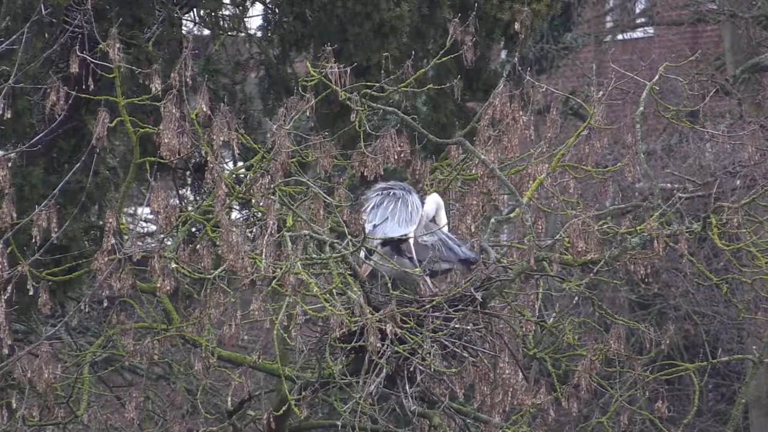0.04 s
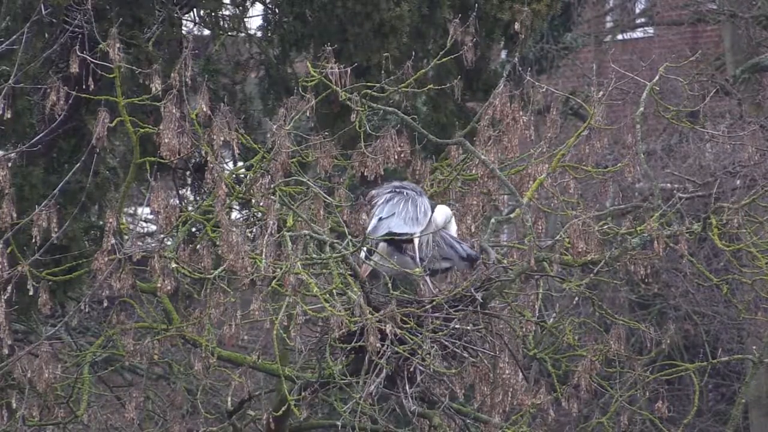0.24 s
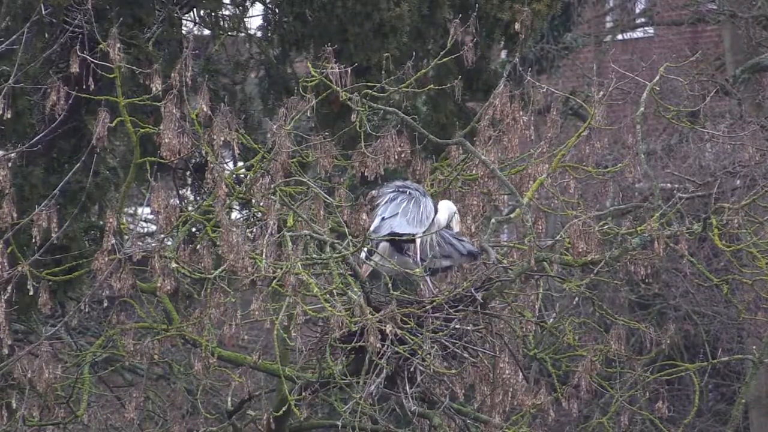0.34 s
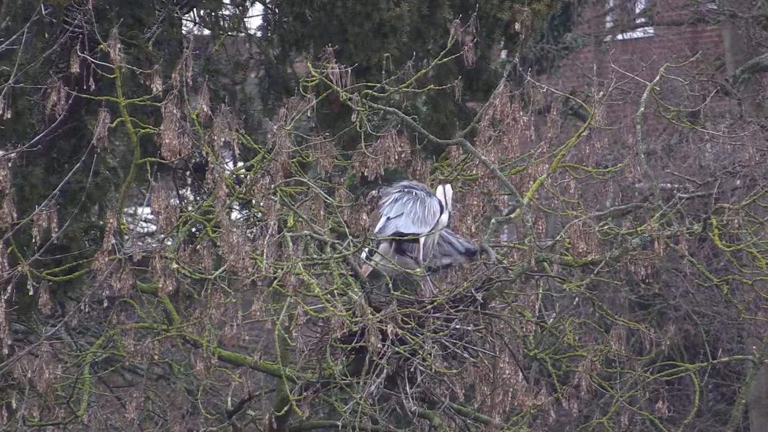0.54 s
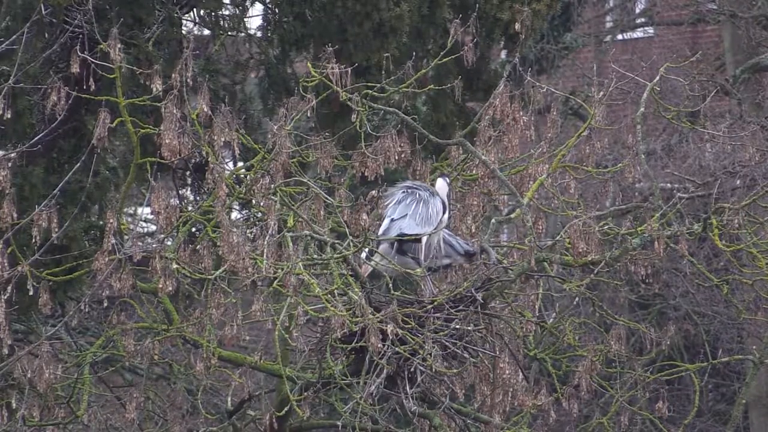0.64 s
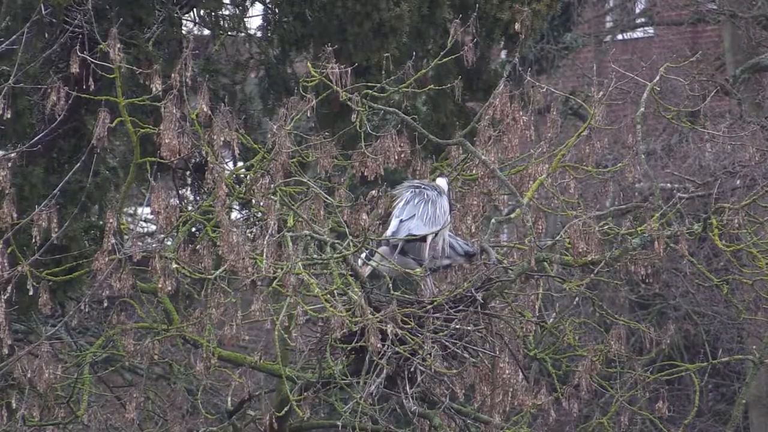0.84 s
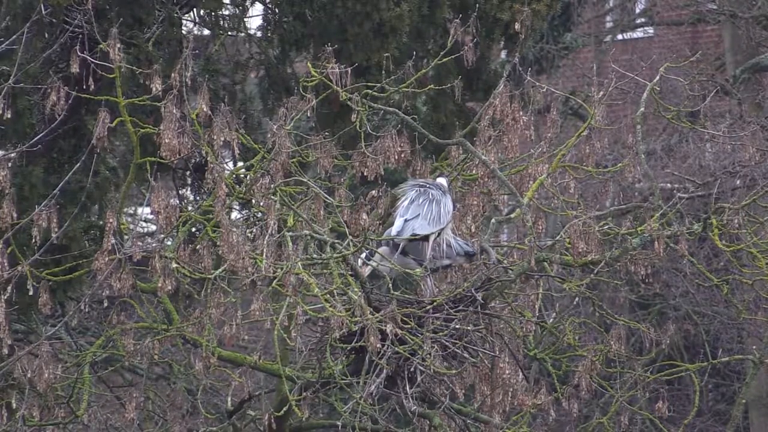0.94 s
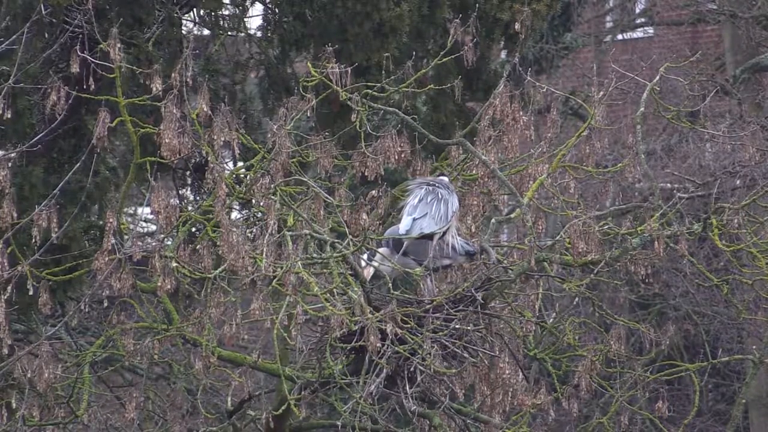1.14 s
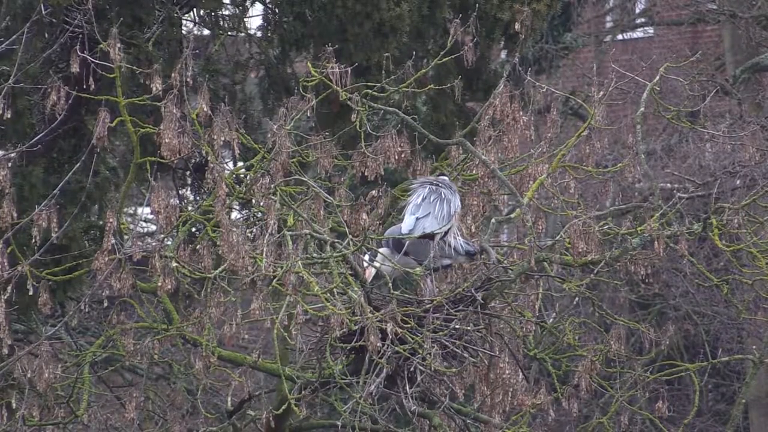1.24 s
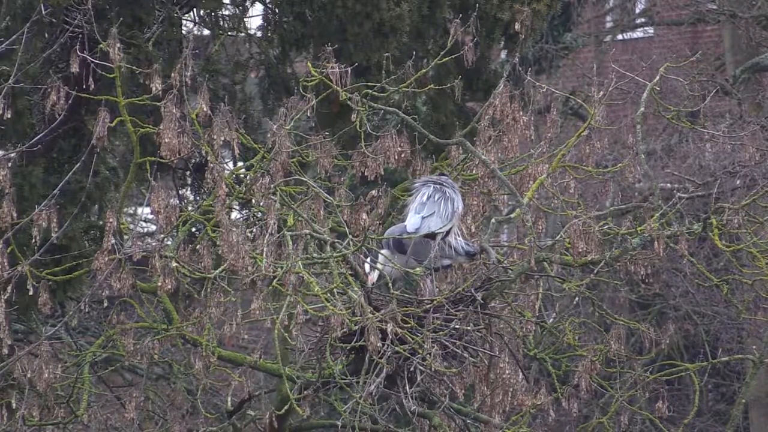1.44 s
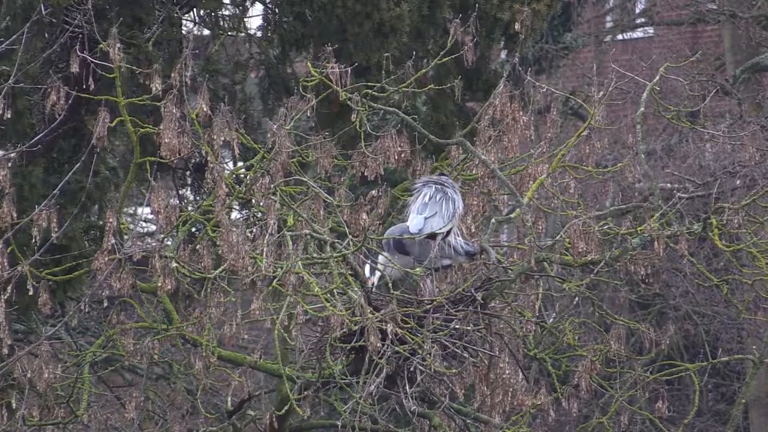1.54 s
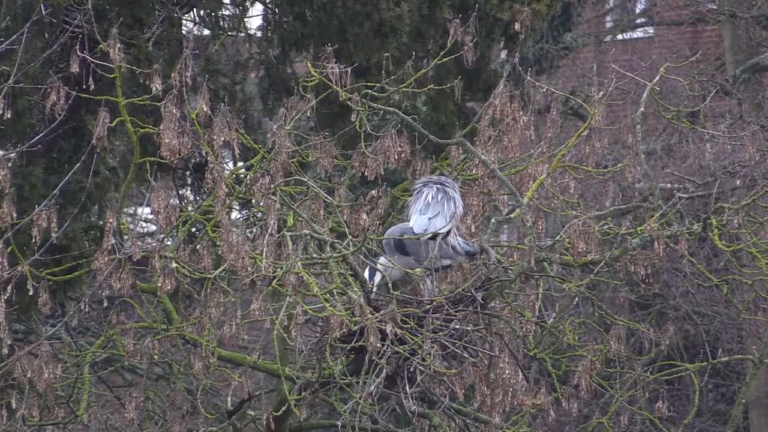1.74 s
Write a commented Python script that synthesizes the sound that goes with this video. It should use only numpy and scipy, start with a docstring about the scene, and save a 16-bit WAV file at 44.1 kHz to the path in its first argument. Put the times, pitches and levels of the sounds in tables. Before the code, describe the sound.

A large bird squawks once, high and rasping, breaking into a growl near the end. A few dull stick knocks and a short croak follow, outdoors among trees, with a low rumble and faint faraway birds behind.

```python
"""A heron on a treetop nest gives one long harsh squawk and, later, a brief croak.
Its voice is a high reedy tone, shaped by the throat and chopped into bursts by a flutter of the
airway, with air rasping and hissing along. Near its end the squawk breaks to a lower growl.
Shifting nest sticks knock and tick, far birds call over a low outdoor rumble,
and the trees send back a faint echo."""
import sys
import numpy as np
from scipy import signal
from scipy.fft import rfft, irfft
from scipy.io import wavfile
from scipy.ndimage import uniform_filter1d

SR = 44100
rng = np.random.default_rng(int(sys.argv[2]) if len(sys.argv) > 2 else 0)


def generate_wav(sig):
    """Save sig (samples, or channels by samples) to the path in sys.argv[1] as 16-bit PCM at SR."""
    pcm = np.round(np.clip(np.atleast_2d(sig).T, -1, 1) * 32767).astype(np.int16)
    wavfile.write(sys.argv[1], SR, pcm)


N = 79380
T = np.arange(N) / SR

# The tone of the outdoor background. Each row: frequency in Hz, relative strength in dB.
AIR_SPECTRUM = [(22, -9), (45, 7.5), (90, -1), (280, -5), (450, -8.5), (1300, -12.5), (2000, -18),
                (2800, -18.5), (4000, -24), (5300, -39.5), (11000, -46.5), (15500, -49)]
# How the rustle dies down. Each row: time in seconds, change of level in dB.
RUSTLE_LEVELS = [(0, 1.5), (1, -0.5), (1.4, -3), (1.8, -5.5)]
# Far birds. Each row: start and length in seconds, first, middle and last pitch in Hz, level in dB.
FAR_CALLS = [(0.093, 0.14, 1265, 1190, 1370, -36.5), (0.072, 0.19, 285.2, 301.3, 332, -40.5),
             (0.552, 0.27, 383, 360, 394, -39), (0.934, 0.14, 660, 711, 648, -37),
             (1.04, 0.058, 1230, 1174, 1020, -37.5), (1.542, 0.044, 4030, 3980, 3420, -46),
             (1.771, 0.036, 3150, 3290, 3380, -53)]
# Dull nest knocks. Each row: start in seconds, ringing frequency in Hz, level in dB, decay in seconds.
STICK_KNOCKS = [(0.155, 696, -29, 0.0023), (1.232, 203, -27.5, 0.026), (1.293, 850, -35, 0.043),
                (1.368, 550, -23.5, 0.0091), (1.397, 373, -33, 0.021), (1.455, 476, -29.5, 0.0068)]
# Dry twig ticks. Each row: start in seconds, level in dB.
TWIG_TICKS = [(0.056, -33.5), (0.156, -33), (.169, -33), (1.019, -36.5), (1.18, -47)]

# How fast the airway flutters. Each row: time in seconds, bursts per second.
SQUAWK_FLUTTER = [(.2, 53.9), (.28, 61), (.39, 60.4), (.41, 56), (.47, 59.5), (.56, 59.7), (.59, 57),
                  (.76, 51.7), (.85, 48.1), (.88, 56.5)]
CROAK_FLUTTER = [(1.486, 63.5)]
# The heron's voice. Each row: time in seconds, pitch in Hz, roughness from 0 to 1.
SCREAM_VOICE = [(.21, 780, .9), (.231, 900, .8), (.241, 985, .1), (.258, 1015, .12), (.28, 1125, .4),
                (.31, 1085, .45), (.36, 1010, .42), (.382, 1085, .85), (.407, 1050, .08), (.475, 1062, .12),
                (.565, 1015, .12), (.585, 988, .05), (.6, 1012, .45), (.632, 970, .08), (.657, 985, .1),
                (.668, 850, .45)]
GROWL_VOICE = [(.68, 673, 0.19), (.712, 698.5, .05), (.73, 738, 0.14), (.768, 756.7, 0.33),
               (.779, 638.8, .09), (.8, 697.7, 0.11), (.828, 665, .1), (.842, 795, 1)]
CATCH_VOICE = [(.873, 705, .4), (.879, 1000, .2), (.888, 1005, .15), (.892, 650, .55), (.92, 715, .95)]
CROAK_VOICE = [(1.505, 536, 0.74), (1.527, 598.7, 0.64), (1.536, 834, 0.2)]
# Its loudness. Each row: time in seconds, level of the body (the lower tones) in dB, treble level in dB.
SCREAM_LEVELS = [(.211, -27, -42), (.224, -19.5, -29.5), (.245, -19.5, -20), (.265, -11.5, -23.5),
                 (.386, -13, -23), (.415, -16.5, -20), (.445, -14.5, -20), (.48, -12, -21.5),
                 (.56, -13, -21.5), (.585, -14.5, -19.5), (.63, -19, -22), (.656, -19, -22),
                 (.675, -22, -33)]
GROWL_LEVELS = [(0.681, -21, -24.5), (.71, -21.5, -25), (.735, -21.5, -32), (0.782, -18, -30.5),
                (.8, -23.5, -31.5), (0.824, -23.5, -29.5), (.853, -27, -47)]
CATCH_LEVELS = [(.859, -30, -52), (.87, -23, -42), (.875, -25, -40), (.885, -20.5, -29.5), (.902, -20, -34),
                (.919, -27, -48)]
CROAK_LEVELS = [(1.507, -29, -48), (1.514, -28, -45), (1.525, -23, -38.5), (1.538, -19.5, -39),
                (1.542, -22, -42)]
# How the throat and open bill colour the voice. Each row: frequency in Hz, boost or cut in dB.
SCREAM_THROAT = [(600, -10), (850, -13.5), (1030, -6), (1300, -10), (1700, -1), (2080, 7), (2500, -5.5),
                 (3050, -12.5), (3450, -22), (4150, -12), (5100, -10.5), (6000, -23), (7100, -25.5),
                 (8200, -37), (9500, -51), (12500, -44), (15000, -51)]
GROWL_THROAT = [(680, -14), (1000, -8), (1300, -9), (1490, 9), (1720, 9.5), (1950, 3.5), (2250, -2),
                (2750, -7.5), (3350, -22), (4100, -5), (4800, -11), (7000, -27.5), (8200, -35.5),
                (10000, -38), (14500, -48)]
CATCH_THROAT = [(600, -5), (1000, -6), (1350, 14), (2000, -6.5), (2950, 4), (3400, -4.5), (4000, 6),
                (5000, -8.5), (7200, -24.5), (12000, -18.5), (15000, -32)]
CROAK_THROAT = [(580, -2.5), (850, -28), (1250, 1), (1650, 6.5), (2450, 1.5), (3000, -21), (3500, -9),
                (4300, -22), (7200, -39.5), (12500, -32.5), (15000, -46)]

# One burst, in shares of a flutter cycle: when it opens, rise time, when it is shut, fall time.
SQUAWK_BURST = (.03, .27, 1, .19)
CROAK_BURST = (.02, .12, .87, .2)
PIPE_SPACING_HZ, PIPE_SLIDE_HZ_PER_S = 515, 4800  # gap between windpipe resonances; how fast they fall
TREBLE_HZ, TOP_HZ = 3050, 15600  # where the treble begins and ends
EDGE_S = .005  # short fade at the edge of a sound


def amp(db):
    """Turns decibels into a number to multiply by."""
    return 10 ** (np.asarray(db) / 20)


def unit(x):
    """Scales a sound to an average strength (rms) of 1."""
    return x / np.sqrt(np.mean(x ** 2))


def curve(rows):
    """Each column of a table, joined by straight lines in time."""
    times, *columns = np.array(rows, float).T
    return [np.interp(T, times, c) for c in columns]


def response(points, hz):
    """How strongly a table of Hz and dB lets the given frequencies through."""
    f, db = np.array(points, float).T
    return amp(np.interp(np.log(np.maximum(hz, 1)), np.log(f), db))


def noise(shape):
    """Noise of strength 1, coloured by a function of frequency."""
    spectrum = rfft(rng.standard_normal(N)) * shape(np.fft.rfftfreq(N, 1 / SR))
    return unit(irfft(spectrum, N))


def wobble(hz):
    """Random motion up to about the given rate."""
    return noise(lambda f: 1 / (1 + (f / hz) ** 4))


def ring(hz, q):
    """Noise gathered around one frequency; a higher q makes the band narrower."""
    return noise(lambda f: 1 / (1 + (q * (f / hz - hz / (f + 1))) ** 2) ** 2)


def outdoors(split_hz=500):
    """Far rumble, a light uneven rustle, a deep drone that slowly fades and a thin hiss that grows."""
    low_share = lambda f: 1 / (1 + (f / split_hz) ** 4)
    rumble = amp(-34) * noise(lambda f: response(AIR_SPECTRUM, f) * np.sqrt(low_share(f)))
    rustle = noise(lambda f: response(AIR_SPECTRUM, f) * np.sqrt(1 - low_share(f)))
    rustle *= amp(-39.5 + curve(RUSTLE_LEVELS)[0] + wobble(hz=34))
    drone = amp(-38.5 - 1.5 * T) * ring(hz=47.35, q=3.4)
    hiss = amp(-84 + 12 * T) * ring(hz=8000, q=.19)
    return rumble + rustle + drone + hiss


def far_birds():
    """Faint calls, each one swell on a bending pitch, with an overtone as dull as the background."""
    calls = np.zeros(N)
    for start, length, first, middle, last, db in FAR_CALLS:
        progress = np.clip((T - start) / length, 0, 1)
        swell = np.sin(np.pi * progress)
        hz = first + (last - first) * progress + (middle - (first + last) / 2) * swell ** 2
        phase = 2 * np.pi * np.cumsum(hz) / SR
        overtone = amp(-11) * response(AIR_SPECTRUM, 2 * middle) / response(AIR_SPECTRUM, middle)
        calls += amp(db) * np.sqrt(2) * swell * (np.sin(phase) + overtone * np.sin(2 * phase))
    return calls


def tree_echo(sound, length_s=.14):
    """The trees scatter a sound back as a faint, short echo."""
    tail = ring(hz=1560, q=.14) * amp(-60 * T / length_s) * np.minimum(T / .002, 1)
    tail /= np.sqrt(np.sum(tail ** 2))
    return amp(-21) * signal.fftconvolve(sound, tail)[:N]


def nest_sticks(snaps_per_s=12, snap_decay_s=.0015):
    """Sticks shift in the nest: dull knocks, small dry ticks and a faint scatter of tiny snaps."""
    def hit(start, decay_s):
        rise = np.clip((T - start) / EDGE_S + 1, 0, 1) ** 2
        return rise * np.exp(-np.abs(T - start) / decay_s)

    knocks = sum(amp(db) * hit(start, decay) * ring(hz, q=.86) for start, hz, db, decay in STICK_KNOCKS)
    ticks = sum(amp(db) * hit(start, decay_s=.0048) for start, db in TWIG_TICKS) * ring(hz=2820, q=.98)
    kicks = (rng.random(N) < snaps_per_s / SR) * rng.random(N)
    snaps = signal.fftconvolve(kicks, np.exp(-T / snap_decay_s))[:N] * ring(hz=6500, q=.41)
    return knocks + ticks + amp(-49) * snaps


def per_burst(burst):
    """A random value held through each burst, sliding smoothly to the next."""
    values = np.clip(rng.standard_normal(burst[-1] + 1), -2, 2)
    return uniform_filter1d(values[burst], size=60)


def flutter(rates, shape, leak=.09, sag_depth=.19, sag_width=.125):
    """The airway flaps open and shut. Gives its opening, the bend in pitch and each burst's number."""
    opens, rise, shut, fall = shape
    started = T >= rates[0][0]
    cycles = np.cumsum(curve(rates)[0] * started) / SR
    burst, progress = cycles.astype(int), cycles % 1
    slowness = np.exp(.34 * per_burst(burst))  # some bursts catch later than others
    ease = lambda u: np.sin(np.pi / 2 * np.clip(u, 0, 1)) ** 2
    opening = ease((progress - opens) / (rise * slowness)) * ease((shut - progress) / fall)
    # The pitch sags at both ends of a burst.
    start_sag = np.exp(-(progress / (sag_width * slowness)) ** 2 / 2)
    end_sag = np.exp(-2 * (1 - progress) / sag_width)
    return leak + opening, 1 - sag_depth * (start_sag + end_sag), burst


def windpipe(sound, echo_share=.8):
    """Echoes up and down the windpipe make a row of resonances (boosted tones) that slide downward."""
    sound = signal.hilbert(sound)  # in this form each echo can be shifted in phase
    lag = round(SR / PIPE_SPACING_HZ)
    round_trip = echo_share * np.exp(-2j * np.pi * PIPE_SLIDE_HZ_PER_S * T / PIPE_SPACING_HZ)
    return unit(sum(np.roll(sound, k * lag) * round_trip ** k for k in range(4)).real)


def breath(throat, opening, rasp_db, treble_db, hiss_above_hz=2450):
    """Air hisses in the windpipe and rasps in the throat; about half of it passes between bursts."""
    hiss = windpipe(noise(lambda f: response(throat, f) / (1 + (hiss_above_hz / (f + 1)) ** 20)))
    hiss *= amp(treble_db - 5.5) * (.45 + .55 * opening)
    rasp = amp(rasp_db) * ring(hz=1694, q=1.7) * (.55 + .45 * opening)
    return hiss + rasp


def last_pulse(start_s=1.5528, hz=1750, peak_db=-19, decay_s=.0005):
    """The croak stops on one lone pulse that rings the throat for an instant."""
    age = np.maximum(T - start_s, 0)
    swell = age / decay_s * np.exp(1 - age / decay_s)
    return amp(peak_db) * swell * np.sin(2 * np.pi * hz * age)


def heron(voice, levels, throat, flutter_rates, burst_shape):
    """One part of a call: a shaky tone, shaped by the throat and chopped by the flutter, plus breath."""
    pitch, roughness = curve(voice)
    body_db, treble_db = curve(levels)
    opening, bend, burst = flutter(flutter_rates, burst_shape)
    hz = pitch * bend * (1 + .008 * per_burst(burst) + .006 * wobble(hz=110))
    # Roughness shakes both the pitch and the loudness.
    shaky_hz = hz * (1 + .085 * roughness * wobble(hz=600))
    drive = opening * (1 + .3 * roughness * wobble(hz=600))
    phase = 2 * np.pi * np.cumsum(shaky_hz) / SR
    # Near 0.52 s the scream tightens: the lowest tone and the rasp drop, leaving a piercing overtone.
    tighten_db = 9 * np.exp(-((T - .52) / .07) ** 2)
    fade = np.clip(np.minimum(T - levels[0][0], levels[-1][0] - T) / EDGE_S + 1, 0, 1)
    on = fade > 0

    # The tone is a stack of harmonics (whole multiples of the pitch), mixed anew for each burst.
    harmonics = np.arange(1, 27)[:, None]
    harmonic_hz = harmonics * hz[on]
    flicker_db = 2.6 * np.array([per_burst(burst)[on] for _ in harmonics])
    gains = response(throat, harmonic_hz) * (harmonic_hz < TOP_HZ)
    gains *= amp(flicker_db - tighten_db[on] * (harmonics == 1))
    treble_share = 1 / (1 + (TREBLE_HZ / harmonic_hz) ** 24)
    at_level = lambda part, db: part * amp(db[on]) / np.sqrt(np.sum(part ** 2, axis=0) / 2)
    body = at_level(gains * (1 - treble_share), body_db)
    # High harmonics swell and dip as the windpipe's resonances slide over them.
    ripple_db = 4 * np.cos(2 * np.pi * (harmonic_hz + PIPE_SLIDE_HZ_PER_S * T[on]) / PIPE_SPACING_HZ)
    treble = at_level(gains * treble_share, treble_db - 1.7) * amp(ripple_db)
    waves = np.sin(harmonics * phase[on] + rng.uniform(0, 2 * np.pi, harmonics.shape))
    tone = np.zeros(N)
    tone[on] = np.sum((body + treble) * waves, axis=0)

    chopped = tone * drive / np.sqrt(np.mean(opening[on] ** 2))
    rasp_db = body_db - 12.5 - tighten_db / 2
    return (chopped + breath(throat, opening, rasp_db, treble_db)) * fade


def scene():
    """The squawk (scream, growl, closing catch) and the croak outdoors, nearly alike in both ears."""
    scream = heron(SCREAM_VOICE, SCREAM_LEVELS, SCREAM_THROAT, SQUAWK_FLUTTER, SQUAWK_BURST)
    growl = heron(GROWL_VOICE, GROWL_LEVELS, GROWL_THROAT, SQUAWK_FLUTTER, SQUAWK_BURST)
    catch = heron(CATCH_VOICE, CATCH_LEVELS, CATCH_THROAT, SQUAWK_FLUTTER, SQUAWK_BURST)
    croak = heron(CROAK_VOICE, CROAK_LEVELS, CROAK_THROAT, CROAK_FLUTTER, CROAK_BURST) + last_pulse()
    calls = scream + growl + catch + croak
    middle = calls + tree_echo(calls) + nest_sticks() + far_birds() + outdoors()
    side = amp(-40.5) * (outdoors() + tree_echo(calls))
    return np.array([middle + side, middle - side])


def record(dry):
    """A steep filter cuts off the very highest treble."""
    return signal.sosfilt(signal.ellip(10, .2, 80, TOP_HZ, fs=SR, output="sos"), dry)


dry = scene()
out = record(dry)
generate_wav(out)
```